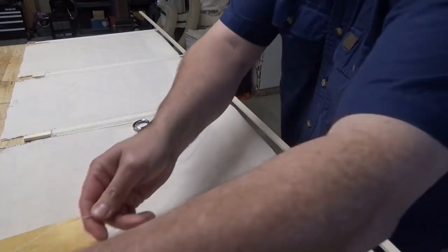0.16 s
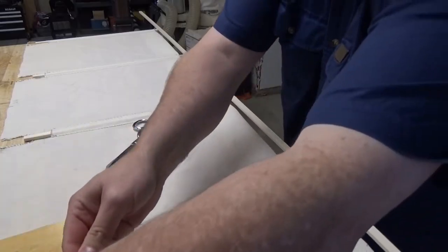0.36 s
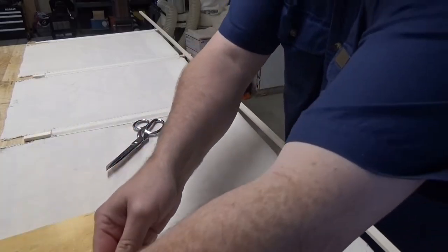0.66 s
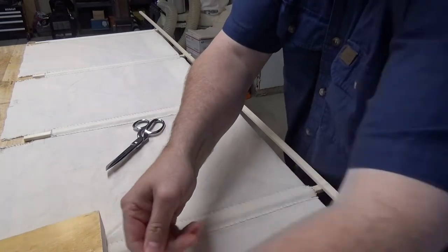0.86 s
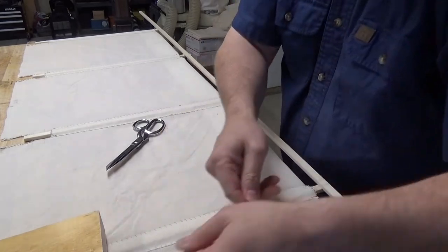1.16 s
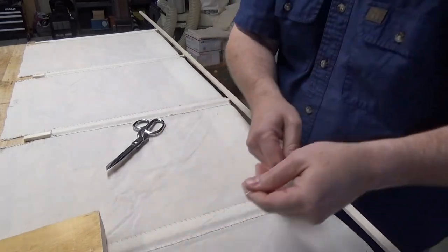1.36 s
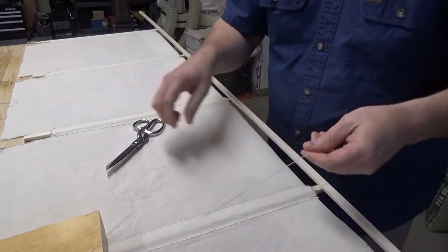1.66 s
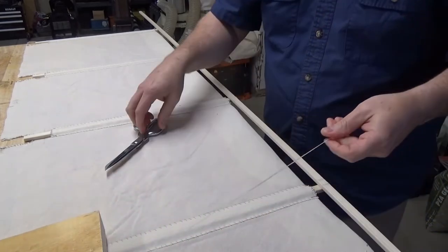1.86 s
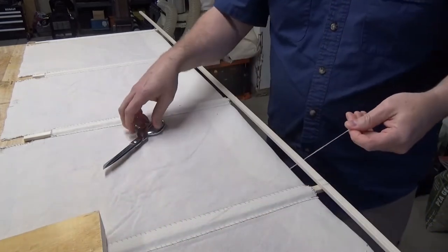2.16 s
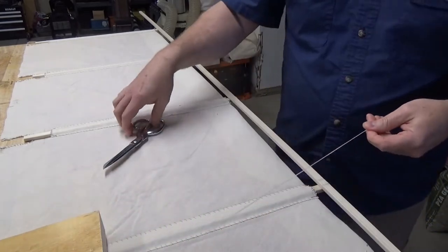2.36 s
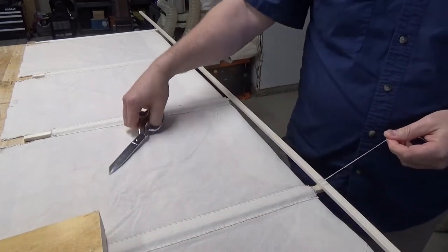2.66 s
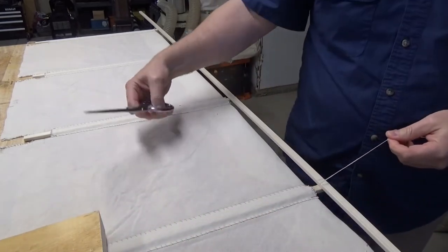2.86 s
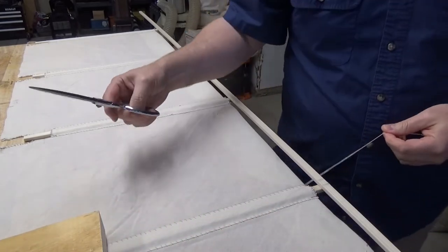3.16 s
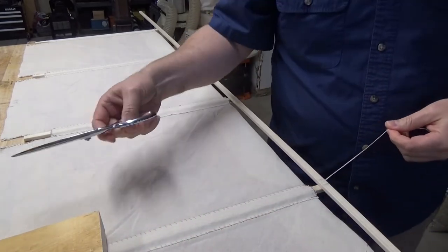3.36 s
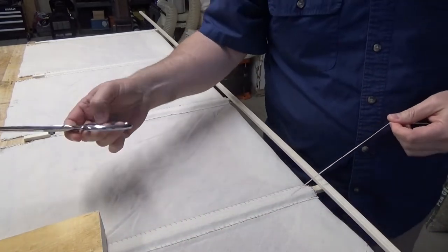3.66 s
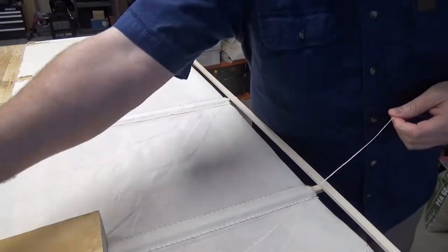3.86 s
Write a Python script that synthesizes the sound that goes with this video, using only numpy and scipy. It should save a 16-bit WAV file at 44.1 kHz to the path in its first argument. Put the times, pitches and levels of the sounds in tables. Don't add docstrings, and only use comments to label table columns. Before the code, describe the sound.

Soft gritty cloth rubbing and tiny snaps open the scene, followed by light wooden taps and the loudest hollow thump before one second. Thread and wood then drag jerkily along the frame, creaking, knocking and hissing. Near two and a half seconds come a small tap and a short steel clink with brief ringing. Then only quiet air, a faint camera ticking and barely audible metallic rubs; close microphones, small dry-sounding room.

```python
import sys
import numpy as np
from scipy import signal
from scipy.io import wavfile
from scipy.ndimage import uniform_filter1d

SR = 44100
rng = np.random.default_rng(int(sys.argv[2]) if len(sys.argv) > 2 else 0)


def generate_wav(signal):
    frames = np.transpose(np.atleast_2d(signal))
    scaled = np.clip(frames, -1, 1) * 32767
    pcm = np.round(scaled).astype(np.int16)
    wavfile.write(sys.argv[1], SR, pcm)


def invert_db(level):
    return 10 ** (np.asarray(level, dtype=float) / 20)


N = 177590


def rms_one(x):
    return x / np.sqrt(np.mean(x ** 2) + 1e-20)


def in_time(rows):
    s, *columns = np.transpose(rows)
    return [np.interp(np.arange(N) / SR, s, c) for c in columns]


def at_hz(points, hz):
    points_hz, values = np.transpose(points)
    return np.interp(np.log(hz), np.log(points_hz), values)


def lean(left_right_db):
    return invert_db(left_right_db * np.array([[0.5], [-0.5]]))


def bandpass(x, order, low_hz, high_hz):
    return signal.sosfilt(signal.butter(order, [low_hz, high_hz], "band", fs=SR, output="sos"), x)


def drift(rate):
    r = np.exp(-80 * np.pi * rate / SR)
    noise = rng.standard_normal(N // 40 + 2002)
    slow = signal.lfilter([1], [1, -2 * r, r * r], noise)[2000:]
    return np.interp(np.arange(N) / 40, np.arange(len(slow)), rms_one(slow))


def resonate(x, modes):
    out = 0
    for k, (hz, width, level_db) in enumerate(modes):
        r = np.exp(-np.pi * width / SR)
        b = invert_db(level_db) * (-1) ** k * (1 - r * r) / 2 * np.array([1, 0, -1])
        out = out + signal.lfilter(b, [1, -2 * r * np.cos(2 * np.pi * hz / SR), r * r], x)
    return out


def grains(per_s, spread_db):
    sizes = invert_db(spread_db * np.minimum(rng.exponential(1, N), 4)) * rng.choice([-1, 1], N)
    return rms_one(sizes * (rng.random(N) < per_s / SR))


def banded_noise(spectrum, likeness, patchy_db, tilt_db=0, grit=0):
    out, level = 0, 0
    together = drift(14)
    edges = 30 * 2 ** np.arange(0, 9.4, 0.5)
    white = rng.standard_normal((2, 2, N))
    white[:, 0] += grit
    for k, (low, high) in enumerate(zip(edges, edges[1:])):
        hz = np.sqrt(low * high)
        if hz < spectrum[0][0] / 2:
            continue
        mid, side = bandpass(white[k % 2], 2, low, high)
        alike = np.clip(at_hz(likeness, hz), 0, 1)
        band = np.sqrt(1 + alike) * mid + np.sqrt(1 - alike) * side * [[1], [-1]]
        band = invert_db(at_hz(spectrum, hz)) * band
        level = level + np.mean(band ** 2)
        flicker_db = patchy_db * (together + drift(27))
        out = out + band * invert_db(tilt_db * np.log2(max(hz, 1500) / 5000) + flicker_db)
    return out / np.sqrt(level)


def swells(at_s, peak_db, rise_s, fall_s):
    since = np.arange(0, N + 44, 44) / SR - np.asarray(at_s)[:, None]
    rise = np.maximum(rise_s, 1e-3)[:, None]
    fall = np.maximum(fall_s, 1e-3)[:, None]
    pace = np.where(since < 0, -rise, fall)
    stroke_db = np.asarray(peak_db)[:, None] - 10 * (since / pace) ** 1.07
    power = np.sum(invert_db(2 * stroke_db), axis=0)
    return np.interp(np.arange(N) / 44, np.arange(len(power)), 10 * np.log10(power + 1e-12))


def load_levels():
    # start in seconds, load in dB, seconds to fade 10 dB,
    # long rail share in dB, cross bar share in dB.
    jolts = [
        (0.388, -46.5, 0.04, -8.5, -3.5),
        (0.494, -52.5, 0.08, -17, -14.5),
        (0.693, -43, 0.0042, -5, 6),
        (0.737, -38, 0.0862, -2, 1),
        (2.104, -48.5, 0.08, -16, 4.5),
        (2.579, -45.5, 0.09, -6, -6),
        (2.641, -52, 0.09, -3.5, -17),
    ]
    # peak in seconds, then columns as for the jolts.
    slides = [(0.436, -50.5, 0.02, -8.5, -11), (.96, -50.5, 0.083, -12, 1), (1.02, -53, 0.066, -11.5, -4),
              (1.15, -53.5, 0.067, -10.5, -0.5), (1.272, -43, 0.059, -13, -5),
              (1.43, -52, 0.033, -6.5, 3.5), (1.48, -53.5, 0.049, -7, -4), (1.57, -51.5, 0.044, -8, 0),
              (1.64, -57, 0.12, -9.5, 3.5), (1.746, -49, 0.06, -6, -3), (1.875, -53.5, 0.02, -8, 1),
              (1.964, -45, 0.051, -2.5, -1), (2.06, -52, 0.14, -7, -13), (2.16, -51, 0.075, -18, 0.5),
              (2.38, -57.5, 0.055, -10.5, 5.5), (2.49, -53, 0.096, -20, 0), (2.55, -55.5, 0.044, -4.5, -21),
              (2.97, -77.5, 0.13, -6, 2)]
    s, load_db, fall_s, rail_db, bar_db = np.transpose(jolts + slides)
    rise_s = np.where(np.arange(len(s)) < len(jolts), 0.00072, 1.21 * fall_s)
    deep = swells(s, load_db - 13, rise_s, 1.05 * fall_s)
    rail = swells(s, load_db + rail_db, rise_s, fall_s)
    main = swells(s, load_db, rise_s, fall_s)
    bar = swells(s, load_db + bar_db, rise_s, fall_s)
    return [deep, rail, main, bar]


def scrape_levels():
    # peak in seconds, level in dB, seconds to climb 10 dB,
    # seconds to fade 10 dB, sharpness in dB.
    scrapes = [(0.384, -53, -0.12, 0.08, -13), (.435, -64, 0, 0.14, -8), (.691, -43.5, -0.0178, 0.04, 9),
               (0.718, -36, -0.0223, 0.0883, 2), (.95, -53, 0.02, 0.09, -23), (1.01, -50, 0.05, 0.08, 7),
               (1.141, -47, 0.01, 0.0571, -5), (1.2, -50, 0, 0.066, 3.5), (1.265, -45, 0.03, 0.0752, -1),
               (1.416, -43, 0.0472, 0.0721, -1), (1.6, -44, 0.06, 0.0922, 1.5),
               (1.702, -49, 0.06, 0.03, 8.5), (1.844, -47.5, 0.004, 0.04, 8),
               (1.907, -50.5, 0.03, 0.0433, 3.5), (1.944, -44, 0.0353, 0.0444, 0),
               (1.98, -50.5, 0.05, 0.06, -9), (2.097, -42, -0.0023, 0.02, 4),
               (2.126, -48.5, 0.05, 0.0679, 1.5), (2.321, -57.5, 0.1, 0.12, 3),
               (2.397, -53, 0, 0.0859, -19), (2.47, -62.5, 0.1, 0.15, 0.5), (2.583, -58, -0.1, 0.0766, -1),
               (2.67, -73, -2, 0.64, 10)]
    s, scrape_db, rise_s, fall_s, sharp_db = np.transpose(scrapes)
    upper_db = swells(s, scrape_db, rise_s, fall_s)
    slat_db = swells(s, scrape_db - 8 + 0.38 * sharp_db, rise_s, 0.99 * fall_s)
    blunt_db = -60.5 + 0.74 * (scrape_db + 43.5)
    hiss_db = swells(s, blunt_db + sharp_db, rise_s, fall_s)
    return upper_db, slat_db, hiss_db, hiss_db - swells(s, blunt_db, rise_s, fall_s)


def frame():
    # frequency in Hz, width in Hz, level in dB.
    deep, long_rail = [(153.6, 9.7, -5), (196.4, 14.3, 3), (216.4, 41, -5)], [(293.5, 15.6, 1.5), (319.8, 12.2, 1), (365, 36, -6.5)]
    main, cross_bar = [(391.5, 51, -2), (420, 16.4, 0.5), (455, 30.7, 3.5), (518.3, 17, 3.5)], [(564, 21.4, -1), (617, 14.8, 1), (655, 12, 3), (763, 61, -8)]
    upper, top = [(845, 29, -4), (906, 20, 4.5), (974, 38, 0.5), (1016.5, 53, 0), (1112, 20.6, 4),
                  (1190, 29, -0.5), (1267, 34, 0.5), (1380, 39, -12.5)], [(1465, 41, 3.5), (1586, 55, 3.5), (1693, 36, 4), (2170, 670, -6),
                                 (2340, 44, 3.5), (2600, 180, -7.5)]
    # start in seconds, peak in dB, centre of the modes struck in Hz,
    # spread in octaves.
    knocks = [(0.384, -44, 1090, 0.32), (0.391, -33, 455, 0.38), (0.408, -39.5, 890, 0.13),
              (0.461, -34, 503, 0.087), (0.495, -41, 430, 0.44), (0.69, -31, 560, 0.2),
              (0.6949, -23.5, 300, 0.24), (0.7171, -23.5, 1190, 0.14), (0.7196, -22, 1150, 0.14),
              (0.729, -25.5, 388, 0.43), (0.74, -20, 305, 0.29), (0.741, -23, 578, 0.21),
              (0.755, -23, 1080, 0.12), (0.768, -32, 1020, 0.18), (0.81, -30, 320, 0.56),
              (0.99, -37, 440, 0.12), (1.005, -37, 906, 0.091), (1.035, -38.5, 906, 0.081),
              (1.148, -37.5, 420, 0.17), (1.198, -42.5, 900, 0.58), (1.254, -34, 450, 0.4),
              (1.278, -38.5, 900, 0.33), (1.3, -40, 600, 0.47), (1.33, -39.5, 590, 0.4),
              (1.419, -33, 910, 0.28), (1.555, -39, 900, 0.44), (1.619, -47, 1110, 0.2),
              (1.7, -37.5, 1120, 0.28), (1.763, -50, 507, 0.26), (1.841, -44.5, 940, 0.16),
              (1.857, -46, 1320, 0.25), (1.904, -48, 1100, 0.28), (1.919, -41, 950, 0.25),
              (1.971, -36, 596, 0.3), (2.01, -43, 555, 0.28), (2.0952, -37, 1390, 0.25),
              (1.655, -47, 900, 0.26), (1.86, -41, 526, 0.32), (1.87, -36.5, 320, 0.17),
              (1.927, -42, 496, 0.42), (1.956, -32, 322, 0.072), (1.958, -35.5, 1010, 0.2),
              (1.98, -37, 600, 0.25), (2.0, -38, 506, 0.31), (2.098, -26, 1040, 0.12),
              (2.108, -33, 420, 0.41), (2.124, -32, 646, 0.16), (2.126, -40, 920, 0.095),
              (2.3925, -33, 1080, 0.13), (2.581, -35, 646, 0.55), (2.629, -32.5, 504, 0.28),
              (2.96, -61, 450, 0.55), (3.341, -62, 820, 0.89), (3.935, -62, 870, 0.52),
              (3.966, -56.5, 1360, 0.37)]
    at_s, knock_db, knock_hz, octaves = np.transpose(knocks)
    knock_at = np.round(at_s * SR).astype(int)
    upper_db, slat_db, *_ = scrape_levels()
    families = zip([deep, long_rail, main, cross_bar, upper, top],
                   load_levels() + [upper_db, slat_db],
                   [-53, -39, -24, -18, -12, -12],
                   [0, 0.3, 0.5, 0.8, 1.2, 1.8])
    shared = 1.3 * grains(700, spread_db=4)
    out = 0
    for modes, level_db, side_db, lean_db in families:
        slips = shared + 1.05 * grains(1500, spread_db=5)
        slips = slips / np.sqrt(uniform_filter1d(slips ** 2, size=2000))
        far_end = rng.standard_normal(N)
        drive = np.array([slips, far_end]) * invert_db(level_db) / resonate(slips, modes).std()
        dragged, struck = 0, 0
        for k, (hz, width, mode_db) in enumerate(modes):
            wander = invert_db(1.62 * drift(8.4))
            dragged = dragged + (-1) ** k * resonate(drive * wander, [(hz, width, mode_db)])
            blows = np.full(N, 1e-18)
            blows[knock_at] = invert_db(knock_db - 9 - 8.6 * (np.log2(hz / knock_hz) / octaves) ** 2)
            ring = resonate(blows, [(hz, 1.33 * width, mode_db)])
            struck = struck + ring * SR / (3 * np.pi * width)
        mid, side = dragged[0] + struck, invert_db(side_db) * dragged[1]
        wood = bandpass(mid + side * [[1], [-1]], 2, modes[0][0] / 1.15, modes[-1][0] * 1.15)
        out = out + wood * lean(lean_db)
    return out


def load_rumble():
    mid, side = bandpass(rng.standard_normal((2, N)), 2, 0.6 * 120, 120)
    return invert_db(load_levels()[0] - 21.5) * (rms_one(mid) + 0.082 * rms_one(side) * [[1], [-1]])


def rubbing():
    # time in seconds, hiss in dB, brightness in dB per octave.
    hand = [(0, -57, 0), (.23, -57.5, 0.5), (.45, -65.5, 1.5), (.66, -70, 2), (.9, -60, -1),
            (1.4, -65.5, 1.5), (1.8, -64, 0.5), (2.05, -70, 4.5), (2.3, -67.5, -2.5), (2.55, -64.5, -1.5),
            (2.62, -61, 0.5), (2.9, -66.5, -0.5), (3.05, -72, -2), (3.2, -75, -2), (3.35, -72, -1),
            (3.65, -86, -3), (3.85, -73, -0.5), (4.03, -70, -1)]
    # frequency in Hz, level in dB per Hz.
    cloth = [(180, -38), (300, -7.5), (348, -7.5), (470, -4.5), (749, -1.5), (1390, -0.5), (1780, -1.5),
             (3080, -2), (6620, -3), (12700, -14.5), (16000, -61)]
    # frequency in Hz, likeness from 0 to 1.
    rub_likeness = [(300, 1), (3000, 0.83), (7000, 0.83), (15000, 1)]
    # frequency in Hz, width in Hz, level in dB.
    weave = [(3950, 180, 4.5), (5830, 130, -1), (8500, 280, -6.5)]
    _, slat_db, scrape_db, sharp_db = scrape_levels()
    hand_db, hand_tilt_db = in_time(hand)
    share = 1 / (1 + invert_db(2 * (hand_db - scrape_db)))
    hiss_db = hand_db - 10 * np.log10(1 - share + 1e-9)
    tilt_db = share * 0.34 * sharp_db + (1 - share) * hand_tilt_db
    pan_db = share * 5 - (1 - share)
    fibres = grains(500, spread_db=5.5)
    pressed, = in_time([(2.6, 1), (2.8, 0.3)])
    hiss = banded_noise(cloth, rub_likeness, patchy_db=0.66 * pressed, tilt_db=tilt_db,
                        grit=0.15 * pressed * fibres)
    flat, = in_time([(1.1, 0), (1.18, 1), (1.98, 1), (2.04, 0)])
    rings = rms_one(resonate(grains(1200, spread_db=3.5), weave))
    rings = rings * flat * invert_db(slat_db - 10 + 3.96 * drift(24))
    return (hiss * invert_db(hiss_db + 0.5) + rings) * lean(pan_db)


def snaps():
    # start in seconds, peak in dB, centre in Hz, left-right in dB,
    # dull part in relative dB.
    snags = [(0.173, -35, 3950, -2, -11), (0.2326, -28, 4700, -2.0, 1), (0.3478, -36.5, 4100, -4, 0.5),
             (0.383, -44.5, 2600, 3, -4), (0.485, -52.5, 2900, 5, -15), (0.6900, -37, 6500, 7, 8),
             (0.693, -44, 8000, 0, -3), (0.697, -37, 3070, 3, -8), (0.7153, -33, 3000, 11, -3),
             (0.719, -30, 2400, 1, -13), (0.7286, -34.5, 5000, -4, -8), (0.738, -36, 2920, 1.5, -5),
             (0.94, -40.5, 3220, -1, -3), (1.027, -45, 2340, 2.5, -3), (1.1947, -39.5, 2600, 2, 1.5),
             (1.244, -40.5, 2400, 3, 0), (1.2422, -42, 9500, 0.5, -17), (1.419, -45, 2600, 3, -8),
             (1.694, -44, 2300, 8, -2), (1.8405, -45, 4000, 4, -6), (1.85, -39, 10900, 3, -14),
             (1.915, -48, 2380, 4, -2), (2.0948, -41, 10500, 2, -6), (2.0977, -33.5, 11000, 6, 11),
             (2.585, -28, 7500, 3, -22), (3.82, -53.5, 2150, 4, -7)]
    more_snags = [(0.817, -52, 7900, 0.5, -25), (1.064, -44, 7240, 1, -29), (3.5544, -62, 9300, 4, -25),
                  (3.5744, -58, 9350, 2, -28), (3.859, -57, 7700, -0.5, -30), (1.014, -47, 7960, 1.5, -20),
                  (1.043, -45.5, 8900, 3, -21), (1.071, -52, 8500, 1.5, -11), (1.161, -45.5, 5700, 7, -8),
                  (1.3544, -56, 9500, 0.6, -10), (1.57, -47, 7400, 6, -15), (1.915, -50, 12000, -1, -20),
                  (3.82, -62, 7500, 2, -14), (3.566, -63, 9800, 2, -25), (3.845, -63, 6500, 0, -15),
                  (0.975, -43, 2440, 2, -8), (1.4009, -45, 2230, 5, -6), (1.6034, -47, 2400, 6, -6),
                  (1.954, -46, 2600, 3, -6), (2.035, -55, 3300, 4, -4), (2.108, -47, 2680, 2.5, -2),
                  (1.655, -49, 4000, 3, -8), (1.857, -49, 12000, 2, -20), (1.705, -50, 12500, 2, -20)]
    out, t = np.zeros((2, N + 4000)), np.arange(4000) / SR
    soft = signal.butter(4, 15300, fs=SR, output="sos")
    for k, (s, peak_db, hz, pan_db, dull_db) in enumerate(snags + more_snags):
        t60, width = 0.0098, 0.55
        if k >= len(snags) and hz > 5000:
            t60, width = 0.025, 0.26
        burst = rng.standard_normal(4000) * invert_db(-60 * t / t60)
        burst[0] = 9
        overtone = (min(1.77 * hz, 12000), 0.76 * hz, -13.5)
        burst = resonate(burst, [(1550, 1000, dull_db), (hz, width * hz, 0), overtone])
        burst = signal.sosfilt(soft, burst)
        start = round(s * SR)
        out[:, start:start + 4000] += burst / abs(burst).max() * invert_db(peak_db) * lean(pan_db)
    return out[:, :N]


def scissors():
    closed_hz = [5900, 6450, 6826, 7150, 7500, 9150, 9378, 9785, 10470, 10080, 13590, 3050, 4000, 2100]
    # level in dB, T60 in seconds.
    closed = [(-12, 0.027), (-5, 0.06), (-8, 0.035), (-17, 0.03), (-17, 0.022), (-5, 0.011), (-10, 0.022),
              (-8, 0.025), (-11, 0.024), (-12, 0.022), (-12, 0.045), (-24, 0.03), (-21, 0.05), (-16, 0.022)]
    # frequency in Hz, level in dB, T60 in seconds.
    free_blade = [(5700, -30, .3), (6735, -23, .12), (7020, -25.5, 0.28), (7838, -33, 0.22),
                  (8150, -28, 0.23), (9372, -33, .15), (9660, -27, 0.22), (10310, -29, .25),
                  (10700, -31, .15), (11300, -18, .02), (12100, -20, 0.012), (13590, -33, .15),
                  (14050, -32, .15)]
    # frequency in Hz, width in Hz, level in dB.
    pivot = [(3600, 150, -1), (4450, 150, -2), (5300, 150, -3), (6900, 140, 2), (7800, 180, 1)]
    clusters = [(4700, 900, -9), (5800, 450, -1), (6570, 350, 1), (6750, 400, -2), (7200, 270, 1),
                (8000, 300, -3), (9300, 450, 0), (9600, 430, 2.5), (10130, 590, 2), (10800, 500, 0),
                (11200, 600, -7), (13500, 220, -6), (14050, 450, -8)]
    # peak in seconds, level in dB, seconds to climb 10 dB, seconds to fade 10 dB.
    slidings = [
        (2.57, -72, 0.07, -0.3),
        (2.589, -49, -0.0258, -0.01),
        (2.615, -59, 0.01, 0.024),
    ]
    squeaks = [
        (3.29, -74, .04, 0.27),
        (3.42, -74.5, 0.11, .05),
        (3.47, -80, .04, .03),
        (3.66, -85, 0.08, 0.08),
        (3.83, -78, .04, .05),
    ]
    clink_s, clink_db, chatter_t60_s = 2.5853, -32.5, 0.024
    out, since = np.zeros(N), np.arange(N) / SR - clink_s
    chatter = (since >= 0) * invert_db(clink_db - 60 * np.abs(since) / chatter_t60_s)
    modes = [(hz, *rest) for hz, rest in zip(closed_hz, closed)] + free_blade
    for hz, level_db, t60 in modes:
        r, w = invert_db(-60 / (t60 * SR)), 2 * np.pi * hz / SR
        contacts = chatter * rng.standard_normal(N) * invert_db(level_db - 22.5) + 1e-18
        contacts[round(clink_s * SR)] = invert_db(clink_db + level_db + 2.5) * rng.choice([-1, 1])
        out += signal.lfilter([0, np.sin(w)], [1, -2 * r * np.cos(w), r * r], contacts)
    out += bandpass(chatter * rng.standard_normal(N) * invert_db(-8), 2, 10000, 13500)
    squeak = rms_one(resonate(grains(2500, spread_db=1) * invert_db(1.7 * drift(27)), pivot))
    shimmer = resonate(resonate(rng.standard_normal(SR), clusters), clusters)
    shimmer = np.tile(rms_one(shimmer), 5)[:N]
    out += invert_db(swells(*np.transpose(squeaks))) * squeak
    out += invert_db(swells(*np.transpose(slidings))) * shimmer
    return out * lean(1.2)


def workshop(x, t60, cut_hz):
    t = np.arange(int(0.6 * SR)) / SR
    tail = rng.standard_normal((2, len(t))) * invert_db(-60 * t / t60) * np.minimum(t / 0.0027, 1)
    tail = bandpass(tail, 1, cut_hz, 12000)
    tail = tail / np.sqrt(np.sum(tail ** 2) / 2)
    return signal.fftconvolve(x.mean(0)[None], tail)[:, :N]


def camera_tick():
    # time in seconds, level in dB.
    tick_level = [(.5, -66.5), (2.2, -62), (2.8, -64), (3.3, -65), (3.75, -67), (4.0, -70)]
    t = np.arange(N) / SR
    first_s, frames_per_s = 0.0238, 29.97
    phase = ((t - first_s) * frames_per_s + 0.5) % 1 - 0.5
    gate = np.exp(-0.5 * (phase / 0.068) ** 2) * invert_db(0.5 * drift(12))
    whine = np.sin(2 * np.pi * 4075 * t + 0.8 * drift(15))
    buzz = rms_one(resonate(rng.standard_normal(N), [(3600, 230, 16), (4340, 300, -23)]))
    tick_db, = in_time(tick_level)
    return gate * invert_db(tick_db) * (whine + invert_db(-10) * buzz)


def machinery_hum():
    # frequency in Hz, width in Hz, level in dB.
    hum = [(79, 15, 7), (946, 15, 16)]
    return invert_db(-88) * rms_one(resonate(rng.standard_normal(N), hum))


def room_air():
    # frequency in Hz, level in dB.
    air = [(18, -45), (30, -19), (79, -5.5), (189, -7), (415, -2.5), (801, -2.5), (913, 2.5), (1460, -5.5),
           (3310, -5.5), (4080, -2), (4530, -9.5), (6900, -8), (13700, -18), (16000, -24)]
    # frequency in Hz, likeness from 0 to 1.
    air_likeness = [(60, 0.9), (150, 1), (380, 0.75), (950, 0.14), (2380, 0.29), (5980, 0.88),
                    (15000, 0.79)]
    return invert_db(-70.5) * banded_noise(air, air_likeness, patchy_db=0.25)


def scene():
    wood, steel = frame(), snaps() + scissors()
    wet = invert_db(-10) * workshop(wood, t60=0.56, cut_hz=3500)
    wet = wet + invert_db(-10.5) * workshop(steel, t60=0.39, cut_hz=900)
    near = wood + load_rumble() + rubbing() + steel
    return near + wet + camera_tick() + machinery_hum() + room_air()


def roll_off(x):
    return signal.sosfilt(signal.butter(12, 16440, fs=SR, output="sos"), x)


def record(dry):
    mix = signal.sosfilt(signal.butter(1, 50, "high", fs=SR, output="sos"), dry)
    mix = signal.sosfilt(signal.cheby2(10, 40, 16150, fs=SR, output="sos"), mix)
    return roll_off(mix)


dry = scene()
out = record(dry)
generate_wav(out)
```